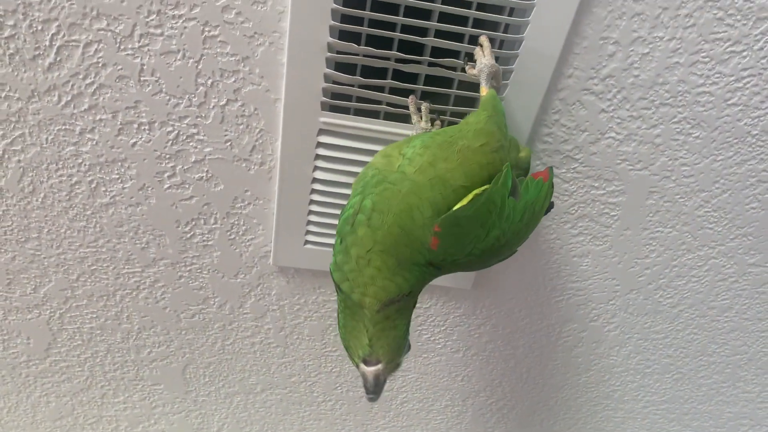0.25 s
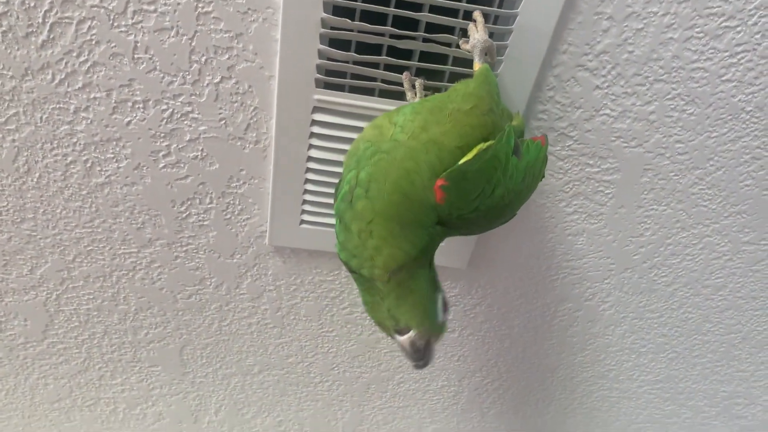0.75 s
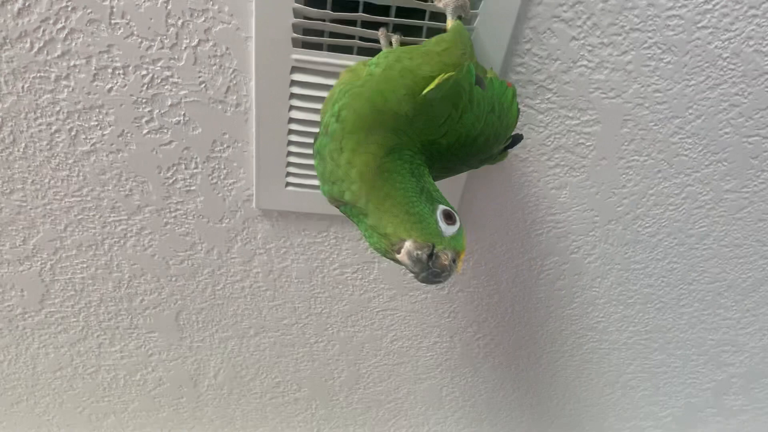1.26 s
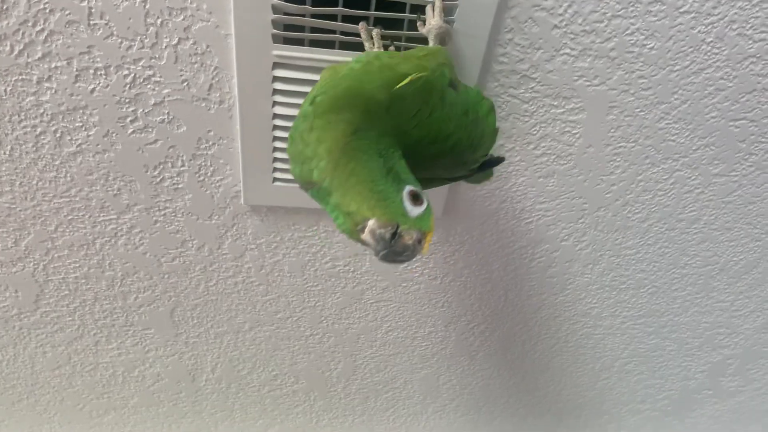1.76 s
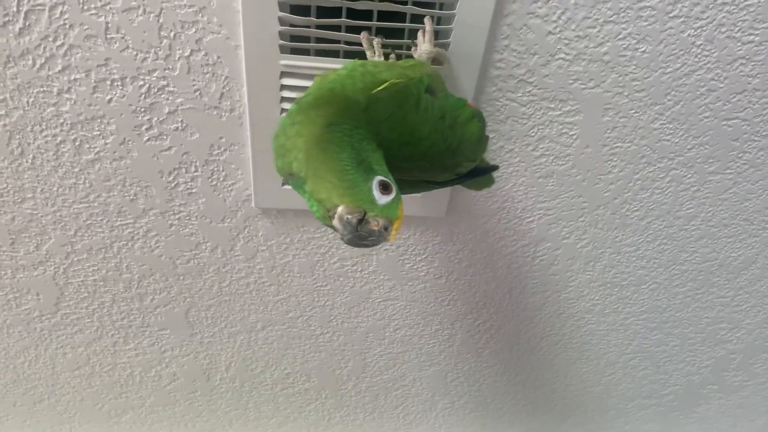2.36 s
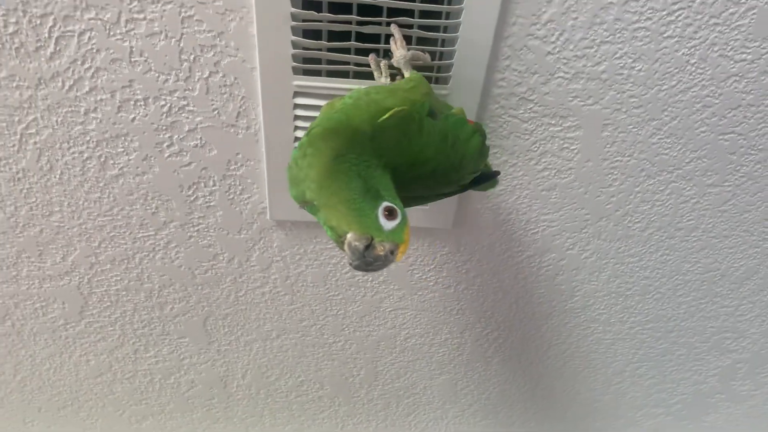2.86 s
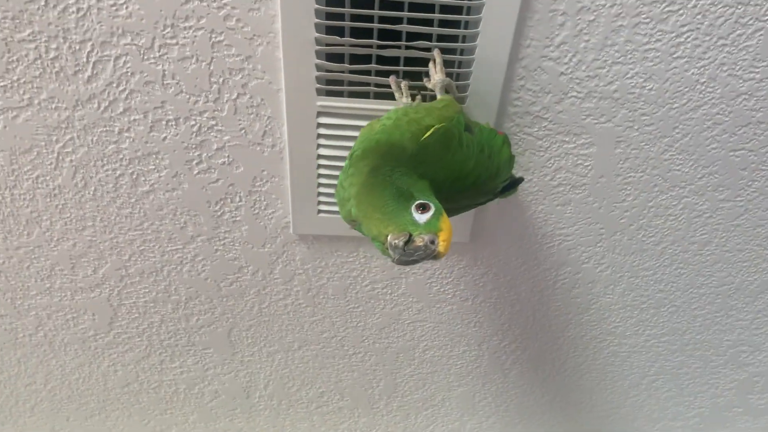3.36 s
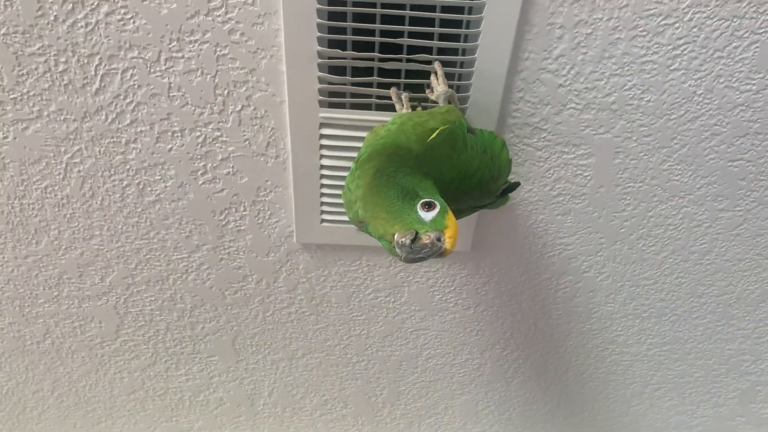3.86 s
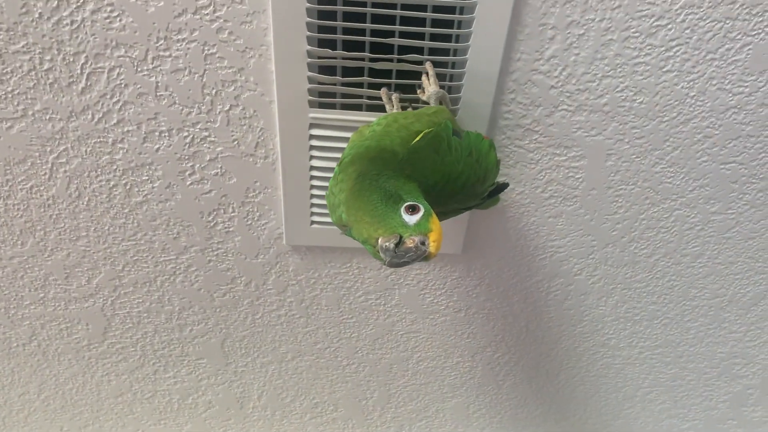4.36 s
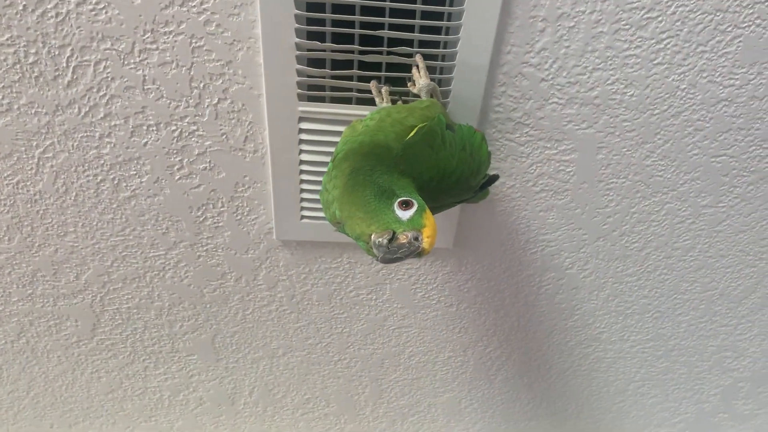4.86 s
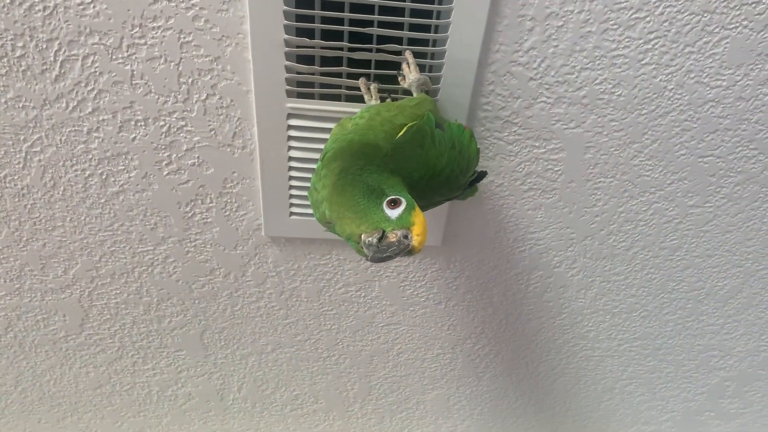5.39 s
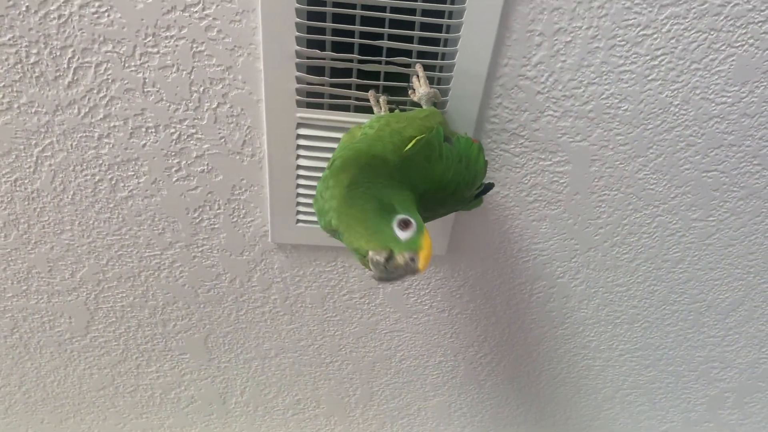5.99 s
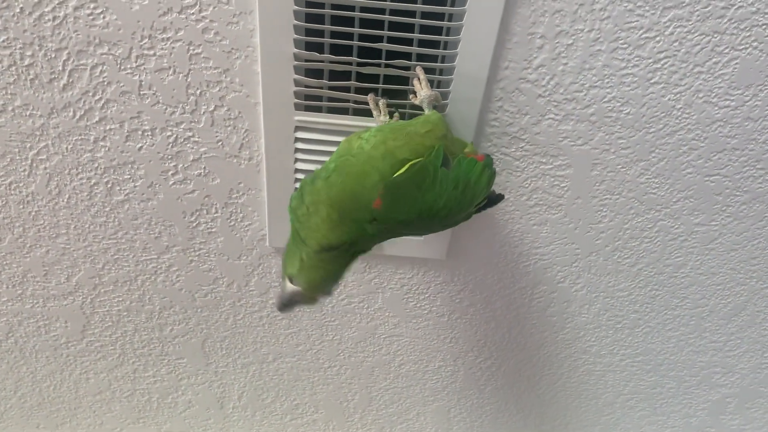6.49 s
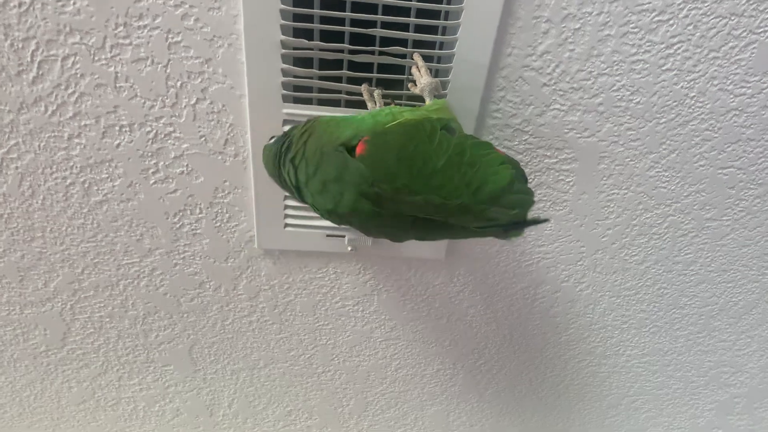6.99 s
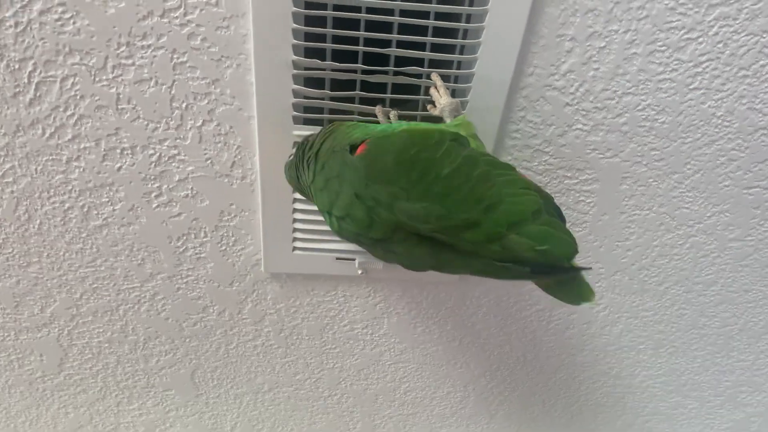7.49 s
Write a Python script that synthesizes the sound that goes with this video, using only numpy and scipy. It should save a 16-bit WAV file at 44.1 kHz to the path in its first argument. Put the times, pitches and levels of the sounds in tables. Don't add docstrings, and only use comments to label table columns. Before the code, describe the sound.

In a quiet room with short, soft echo, faint mains hum and low microphone hiss continue throughout. At 0.1 s a parrot's beak or claw snaps hard on a sheet-metal vent, bright and briefly ringing. Only faint ticks follow until about 1.1 s. From 1.3 to 3.3 s there is an irregular flurry: sharp snaps, ticks and gritty scrapes, strongest near 1.7, 2.25, 2.7 and 3.27 s, with slats singing tinny tones for a fraction of a second. From 3.6 to 4.5 s a hand slides over the phone, a lumpy low rumble with fine rustle, easing into small shifts until 5.2 s; one tick pokes through at 4.15 s. A hard double snap lands at 5.4 s, a weak tap at 5.9 s. Near quiet lasts until 7 s, then lighter taps and scrapes mix with dull phone knocks to the end, around 7.7 s.

```python
import sys
import numpy as np
from scipy import signal
from scipy.fft import rfft, irfft, next_fast_len
from scipy.io import wavfile
from scipy.ndimage import uniform_filter1d

SR = 44100
rng = np.random.default_rng(int(sys.argv[2]) if len(sys.argv) > 2 else 0)


def put_to_file(sound):
    columns = np.atleast_2d(sound).T
    safe = np.clip(columns, -1, 1)
    whole_steps = np.round(safe * 32767)
    wavfile.write(sys.argv[1], SR, whole_steps.astype(np.int16))


def level_to_linear(level):
    exponent = np.asarray(level, float) / 20
    return 10 ** exponent


N = 341334


def rms_one(x):
    return x / np.sqrt(np.mean(x ** 2) + 1e-20)


def at_hz(points, hz):
    table = np.array(points)
    return np.interp(np.log(np.maximum(hz, 1)), np.log(table[:, 0]), table[:, 1])


def colour(x, spectrum):
    log_gain = at_hz(spectrum, np.fft.rfftfreq(8192, 1 / SR)) * np.log(10) / 20
    cepstrum = irfft(log_gain) * np.r_[1, 2 * np.ones(4095), 1, np.zeros(4095)]
    pulse = irfft(np.exp(rfft(cepstrum)))
    return signal.oaconvolve(x, pulse / np.sqrt(np.sum(pulse ** 2)))[:len(x)]


def band_pass(x, low, high):
    return signal.sosfilt(signal.butter(2, [low, high], "band", fs=SR, output="sos"), x)


def ring(push, hz, t60):
    r, w = level_to_linear(-60 / (t60 * SR)), 2 * np.pi * hz / SR
    return signal.lfilter([0, np.sin(w)], [1, -2 * r * np.cos(w), r * r], push + 1e-18)


def grit(spread_db):
    sizes = level_to_linear(spread_db * np.minimum(rng.exponential(1, N), 3))
    return rms_one(rng.standard_normal(N) * sizes)


def waver(spread_db, rate):
    r = np.exp(-80 * np.pi * rate / SR)
    slow = signal.lfilter([1], [1, -2 * r, r * r], rng.standard_normal(N // 40 + 2002))[2000:]
    return np.interp(np.arange(N) / 40, np.arange(len(slow)), level_to_linear(spread_db * rms_one(slow)))


def swell(start, end, db, rise, fall):
    out = np.zeros(N)
    t = np.arange(max(start - 3 * rise, 0) * SR, min((end + 3 * fall) * SR, N)).astype(int)
    outside = np.maximum((start - t / SR) / rise, (t / SR - end) / fall)
    out[t] = level_to_linear(db - 20 * np.maximum(outside, 0))
    return out


# multiple, level/dB rms
HUM = [(1, -55), (2, -65.5), (3, -64), (4, -86), (5, -90), (6, -87.5), (7, -84.5)]


def hum():
    mains_hz = 60.0
    turn = 2 * np.pi * mains_hz * np.arange(N) / SR
    return sum(np.sqrt(2) * level_to_linear(db) * waver(1.9, 1.6) * np.sin(round(k) * turn + 0.6 * k) for k, db in HUM)


# f/Hz, level/dB per Hz
FLOOR = [(22, -31.5), (35, -30.5), (48, -5.5), (90, -8), (150, -12), (250, -18), (350, -24.5), (500, -28),
         (800, -34), (1500, -39.5), (3000, -43), (6000, -43.5), (15600, -45.5), (16100, -87)]


def noise_floor():
    floor_db = -65
    return level_to_linear(floor_db) * colour(rng.standard_normal(N), FLOOR)


# f/Hz, t60/s
ROOM_T60 = [(400, .42), (1300, .34), (3500, .28), (9000, .21), (16000, .15)]


def room(x):
    t, tail = np.arange(SR // 2) / SR, 0
    edges = 250 * 2 ** np.arange(0, 6.3, .5)
    for low, high in zip(edges, edges[1:]):
        band = band_pass(rng.standard_normal(len(t)), low, high)
        tail = tail + band * level_to_linear(-60 * t / at_hz(ROOM_T60, np.sqrt(low * high)))
    tail = tail * (1 - np.exp(-t / 0.016))
    return signal.fftconvolve(x, tail / np.sqrt(np.sum(tail ** 2)))[:N]


# t/s, level/dB
GRIP = [
    (3.56, -89),
    (3.6, -62),
    (3.665, -55),
    (4.14, -52.5),
    (4.33, -51.5),
    (4.46, -56),
    (4.56, -68),
    (5.1, -64.5),
    (5.25, -80),
]
# t/s, level/dB
REGRIPS = [
    (4.345, -66),
    (4.597, -57),
    (4.697, -60.5),
    (4.825, -61),
    (5.0, -109),
    (5.143, -64.5),
    (7.11, -66),
    (7.16, -67),
    (7.45, -58.5),
]


def touch():
    regrip_s, rustle_db, rustle_follows = 0.055, -63.5, 0.77
    s, db = np.transpose(GRIP)
    span = slice(round(s[0] * SR), round(s[-1] * SR))
    pressure = np.zeros(N)
    pressure[span] = level_to_linear(np.interp(np.arange(N)[span] / SR, s, db))
    pressure += sum(swell(s, s, db, regrip_s, regrip_s) for s, db in REGRIPS)
    pressure = pressure * waver(2.5, 16)
    return pressure, level_to_linear(rustle_db) * (pressure / level_to_linear(-52.5)) ** rustle_follows


# f/Hz, level/dB per Hz
RUMBLE = [(22, -25.5), (35, -8), (70, 2.5), (140, -1.5), (250, -7.5), (310, -4), (400, -9.5), (520, -5.5),
          (700, -30.5), (1200, -37), (2200, -35)]
# f/Hz, level/dB per Hz
RUSTLE = [(300, -3), (700, 0), (1500, -4), (3000, -6), (5000, -9), (6300, -13), (7500, -18), (8900, -16),
          (10500, -16.5), (12000, -16), (14000, -14), (15700, -14.5), (16100, -50)]


def hand(rumble, rustle):
    low = colour(rng.standard_normal(N), RUMBLE) * waver(1.77, 11.3)
    skin = colour(grit(1.4), RUSTLE)
    dull = signal.sosfilt(signal.butter(2, 1800, fs=SR, output="sos"), skin)
    high = level_to_linear(1.5) * dull * waver(4.4, 15) + (skin - dull) * waver(1.8, 19.1)
    return level_to_linear(-1.0) * rumble * low + level_to_linear(5.5) * rustle * high


# multiple, level/dB against the rumble
SHUDDER = [(2, 0.5), (3, 3), (4, -20)]


def sway(rumble):
    shudder_hz = 21.5
    turn = 2 * np.pi * shudder_hz * np.cumsum(waver(.2, 1.5)) / SR
    tones = sum(level_to_linear(db) * waver(1.1, 1.7) * np.sin(round(k) * turn) for k, db in SHUDDER)
    return uniform_filter1d(rumble, 9000) * tones


# t/s, level/dB peak, f/Hz
BUMPS = [(0.118, -45, 244), (1.724, -39, 105), (2.721, -56, 260), (3.273, -40.5, 123.6),
         (3.277, -43.5, 286), (5.409, -40, 182), (7.075, -39, 335), (7.085, -36, 247), (7.087, -33, 72.4),
         (7.142, -43, 207), (7.169, -40, 239), (7.184, -42, 68), (7.337, -44, 255), (7.347, -36.5, 81.5),
         (7.451, -59, 247), (7.47, -48, 240)]


def bumps():
    out = np.zeros(N + SR)
    for s, db, hz in BUMPS:
        soft, push = np.hanning(round(SR / hz / 2)), np.zeros(SR // 4)
        push[:len(soft)] = level_to_linear(db - 2.5) * soft / soft.sum()
        out[round(s * SR):][:len(push)] += ring(push, hz, 9.8 / hz)
    return out[:N]


# t/s of the peak, level/dB, swell/s, fade/s (each over 20 dB), extra brightness/dB
SLIPS = [(1.1, -53, 0.016, 0.019, -4), (1.865, -41, 0.014, 0.025, -16), (2.285, -39.5, 0.074, 0.12, -2),
         (2.516, -50, 0.011, 0.038, -7), (2.674, -34, 0.027, 0.023, 10.5), (2.962, -41, 0.018, 0.012, 18.5),
         (3.036, -52, 0.018, 0.049, -7), (3.171, -40.5, 0.041, 0.033, 9), (5.148, -54, 0.037, 0.12, 15),
         (5.271, -63, 0.021, 0.049, 18), (5.388, -37, 0.028, 0.004, -6), (5.958, -58, 0.078, 0.02, -8),
         (6.561, -64.5, 0.077, 0.046, 11), (7.12, -62, 0.11, 0.076, 1), (7.4, -75, 0.081, 0.1, -11),
         (7.45, -65, 0.26, 0.047, 13), (7.635, -40, 0.045, 0.031, 8)]
# start t/s, end t/s, level/dB, extra brightness/dB, extra body/dB
CREEPS = [(1.28, 1.55, -60, -5.5, -1), (1.348, 1.383, -48, 4.5, -9), (1.543, 1.556, -32, -7.5, -4),
          (0.089, 0.107, -50, 7, 0), (2.036, 2.051, -49, 11.5, -10.5), (2.073, 2.092, -47, 0, -2),
          (2.074, 2.226, -57.5, -17.5, -0.5), (2.23, 2.242, -46.5, 22.5, 6.5),
          (2.643, 2.698, -41.5, -6, -1.5), (2.728, 2.755, -47, -3, -0.5), (2.972, 3.255, -55, -11, 0),
          (5.188, 5.38, -66, -9, 9.5), (7.02, 7.22, -77.5, -6.5, 20.5), (7.242, 7.27, -52, 9.5, 1.5),
          (7.327, 7.465, -64.5, -3, 11.5), (7.558, 7.763, -62, -31, 7)]


def drags():
    edge_s = 0.017
    low, middle, top = np.zeros((3, N))
    parts = [(swell(s, s, db, max(rise, .002), max(fall, .002)), 0, bright_db)
             for s, db, rise, fall, bright_db in SLIPS]
    parts += [(swell(start, end, db, edge_s / 4, edge_s), body_db, bright_db)
              for start, end, db, bright_db, body_db in CREEPS]
    for gain, body_db, bright_db in parts:
        low += gain * level_to_linear(body_db)
        middle += gain
        top += gain * level_to_linear(bright_db)
    return [low, middle, top]


# t/s, level/dB peak, low tones/dB, high tones/dB, rattle decay/s
SNAPS = [(0.1105, -14.5, -1, 4, 0.006), (1.3607, -45.5, -4, 20.5, 0.011), (1.4614, -25.5, 1, 5, 0.0059),
         (1.494, -23, -3.5, 8.5, 0.0032), (1.5615, -22, 6, 14.5, 0.0081), (1.694, -17, 5.5, 12.5, 0.0091),
         (1.9543, -33.5, -6.5, 6, 0.012), (2.123, -42.5, 15, 12.5, 0.0072), (2.194, -32.5, -10, 7, 0.0064),
         (2.2576, -27.5, 3, 18, 0.006), (2.2625, -22.5, 0, 6.5, 0.0036), (2.2808, -25, 8, 14, 0.0069),
         (2.6335, -46, 2, 17, .015), (2.7058, -21.5, -2.5, 12, 0.01), (2.7646, -20.5, -2, 7.5, 0.0053),
         (2.9555, -35, -13.5, 1.5, 0.02), (3.1, -32.5, 0, 14.5, 0.014), (3.2655, -14, -2, 7.5, 0.0086),
         (5.3915, -19.5, 0, 10, 0.0056), (5.3985, -14.5, 0, -7, 0.004), (5.417, -28, 2, -3, 0.0029),
         (5.9154, -39, 1.5, -2, 0.0071), (7.0718, -32, 3.5, 7, 0.0059), (7.329, -36, 0, 9, 0.0035),
         (7.3806, -29, 4.5, -16, 0.0037), (7.6297, -36, -6, 13.5, 0.0049), (7.641, -32.5, -20, 4, 0.0092),
         (.1225, -31, 8.5, -3, 0.0064)]
# t/s, level/dB peak, high tones/dB
TICKS = [(0.3249, -49, 0), (0.4453, -75, -2), (0.525, -64, -1), (0.79, -67, 6), (1.0892, -56.5, 8),
         (1.1902, -59.5, 4), (1.2721, -47, 2.5), (1.315, -51, -6), (1.4358, -40, 5.5), (1.5455, -45, -19),
         (2.2326, -47.5, 3), (2.2472, -26.5, -3.5), (2.949, -49, 5), (7.2335, -63, -5), (7.6129, -51, 12),
         (1.859, -38.5, 0.5), (2.0412, -49, 15.5), (2.0775, -41.5, 0), (2.513, -75, 16), (3.032, -37, 3.5),
         (4.1545, -41.5, 2), (5.1405, -56, 7), (6.552, -71, 4), (7.013, -56, 1.5), (7.1458, -45.5, 7),
         (7.5702, -65, 18), (7.7207, -48.5, 4.5)]


def contacts():
    tick_low_db, tick_rattle_s = 3, 0.0087
    ticks = [(s, db, tick_low_db, high_db, tick_rattle_s) for s, db, high_db in TICKS]
    rows = np.array(sorted(list(SNAPS) + ticks))
    lead_s = 0.0061 * level_to_linear(0.16 * (rows[:, 1] + 20))
    return np.c_[rows, lead_s]


def contact_shapes():
    lead_db, snap_db, snap_s = -15.5, 0.42, 0.00049
    t, taps = np.arange(-2000, 3000) / SR, contacts()
    decay, lead = np.maximum(taps[:, 4:5], 3e-4), np.maximum(taps[:, 5:6], 1e-4)
    after = np.maximum(t, 0)
    fall = 1.348 * np.exp(-after / decay) + level_to_linear(snap_db) * np.exp(-after / snap_s)
    return np.where(t < 0, level_to_linear(lead_db) * np.exp(np.minimum(t, 0) / lead), fall)


def contact_force(shapes, hz, chance_db):
    out = np.zeros(N + SR)
    for (s, db, low_db, high_db, _, _), shape, luck_db in zip(contacts(), shapes, chance_db):
        at = round(s * SR) - 2000
        level_db = db + luck_db + low_db * (850 < hz < 3900) + high_db * (hz > 8000)
        out[at:at + len(shape)] += level_to_linear(level_db) * shape
    return out[:N]


# t/s, level/dB
# peak, f/Hz, t60/s
RINGS = [(0.111, -27, 2900, 0.035), (0.14, -42.5, 1900, 0.1), (0.51, -49.5, 2830, 0.021),
         (1.271, -46, 4200, 0.094), (1.28, -56, 1080, 0.21), (1.312, -47, 2830, 0.12),
         (1.46, -42, 2600, 0.08), (1.463, -46, 1900, 0.08), (1.545, -42, 1750, 0.06),
         (1.696, -19, 2360, 0.075), (1.873, -56, 1030, 0.42), (2.078, -48, 6200, 0.04),
         (2.079, -44, 3000, 0.06), (2.082, -54, 1030, 0.3), (2.66, -44, 1653, 0.12),
         (3.269, -43, 1818, 0.19), (2.665, -44, 2980, .12), (1.3, -58, 1250, .15), (1.3, -59, 900, .15),
         (5.4, -57.5, 2215, .2), (5.773, -58.5, 1365, 0.049), (5.268, -64, 1080, .5),
         (5.398, -38.5, 2570, 0.15), (5.42, -64, 1095, 1.2), (5.40, -46, 520, 0.15),
         (7.0725, -39, 2780, 0.03), (7.08, -39.5, 893, 0.056), (7.234, -44, 2750, 0.13),
         (7.255, -54, 3100, 0.16), (7.076, -38, 250, 0.12), (7.44, -47.5, 244, 0.2),
         (7.15, -50, 180, 0.075), (7.28, -55, 3000, 0.089), (3.266, -28, 1900, .04),
         (3.266, -34, 1250, 0.021), (3.266, -30.5, 12000, .03), (1.696, -37, 1250, 0.0396),
         (.111, -21, 11300, 0.024), (.111, -42.5, 1700, .04), (5.393, -29.5, 1800, 0.0403),
         (5.393, -26.5, 11000, 0.042), (2.707, -29.5, 11600, .03), (2.707, -42, 2200, .03),
         (1.563, -35, 1500, .04), (2.766, -42, 1640, .15), (.111, -36, 14400, .12), (1.86, -56, 800, .1),
         (7.381, -41, 3250, 0.063), (5.393, -30, 15200, 0.05)]
# t/s, level/dB peak, f/Hz, t60/s
PANEL_RINGS = [(.113, -52, 596, 0.36), (.113, -57.5, 900, 0.22), (.113, -46, 2540, 0.22),
               (.113, -56.5, 2934, .2), (.113, -50.5, 3350, 0.17), (.113, -39.5, 6800, 0.19),
               (.113, -39, 10950, 0.068), (1.564, -40, 2950, 0.14), (1.564, -47.5, 6557, .1),
               (1.697, -45, 2000, 0.18), (1.697, -46, 2560, 0.22), (1.697, -44, 3060, 0.22),
               (1.697, -41.5, 3510, 0.36), (1.697, -42, 4000, 0.22), (1.697, -36.5, 6760, 0.16),
               (1.697, -43, 11603, .08), (2.245, -51.5, 2560, 0.13), (2.245, -49, 1620, .1),
               (2.26, -36.5, 7000, .06), (2.283, -49.5, 3060, .12), (2.283, -24.5, 2367, 0.081),
               (2.708, -23, 5750, 0.027), (2.708, -40, 2590, 0.17), (3.102, -47, 1678, 0.3),
               (3.102, -54.5, 1840, 0.24), (3.268, -52, 2640, .15), (3.268, -44.5, 2830, 0.43),
               (3.268, -44, 2056, 0.35), (3.268, -43, 1467, 0.31), (3.268, -56, 1100, 0.64),
               (3.268, -52.5, 3760, .12), (3.268, -33, 5520, 0.066), (5.394, -48.5, 900, 0.17),
               (5.394, -45.5, 2050, .2), (5.394, -55, 1670, 0.27), (5.394, -63, 3430, 0.24),
               (5.394, -57, 3951, 0.22), (5.394, -26, 6890, 0.096), (5.394, -37.5, 6550, 0.21),
               (5.394, -46.5, 11440, .08), (5.918, -58, 748, 0.13), (7.074, -51.5, 1560, 0.09),
               (7.382, -48, 2760, .1), (7.43, -54.5, 1550, 0.11), (7.46, -50, 2280, .1),
               (7.632, -55, 1896, 0.14), (7.632, -55, 3290, 0.092), (7.722, -48, 3530, .05),
               (7.15, -60, 1570, 0.071), (7.15, -41, 2585, .05)]
# t/s, level/dB peak, f/Hz, t60/s
SCRAPE_RINGS = [(1.437, -40, 3000, 0.08), (1.495, -43, 2300, .08), (1.563, -38, 2100, .1),
                (1.563, -38, 2400, .08), (1.463, -44, 1600, .08), (7.632, -46, 1800, .1),
                (7.655, -48, 2300, .08), (7.435, -52, 1000, .1), (1.861, -42, 3000, .06),
                (1.8, -48, 1650, .1), (1.8, -47, 2600, .1), (1.88, -60, 1900, .3), (2.124, -46, 2050, .06),
                (2.124, -46, 3000, .06), (2.079, -50, 2450, .1), (2.079, -50, 5200, .05),
                (5.15, -54, 5900, .25), (5.26, -54, 6200, .2), (5.15, -58, 2050, .3), (5.27, -56, 2080, .3),
                (5.16, -65, 1090, .4), (2.958, -42, 3100, .08), (2.958, -46, 2600, .1),
                (2.26, -34, 11200, .04), (2.283, -34, 11600, .04)]


def singing_slats():
    reach_s = .025
    out, t = np.zeros(N + SR), np.arange(SR * 7 // 10) / SR
    loose, touches = waver(4.5, 35), contacts()[:, 0]
    rings = list(RINGS) + list(PANEL_RINGS) + list(SCRAPE_RINGS)
    for (s, db, hz, t60), (p, q) in zip(rings, rng.uniform(0, 2 * np.pi, (len(rings), 2))):
        nearest = touches[np.argmin(abs(touches - s))]
        if abs(nearest - s) < reach_s:
            s = nearest + .001
        turn = 2 * np.pi * t
        tones = np.sin(hz * turn + p) + 0.22 * np.sin((hz + 23) * turn + q)
        tones += 0.5 * np.sin(.972 * hz * turn - q) + .4 * np.sin(1.035 * hz * turn - p)
        fade = level_to_linear(db - 4 - 60 * t / t60) * np.cos(np.pi * t / 1.4)
        onset = 1 - np.exp(-t / (.03 * t60))
        wobble = loose[int(q * SR):][:len(t)]
        out[round(s * SR):][:len(t)] += fade * onset * tones * wobble
    return out[:N]


# f/Hz, level/dB
SLAT_MODES = [(635, -20.5), (1152, -26), (1388, -9), (1641, -3.5), (1819, -7.5), (2368, 0), (2850, 2.5),
              (3644, -18.5), (3999, -1), (4430, -1), (4828, -4), (5087, 4), (5706, 4.5), (6099, -1.5),
              (6556, 2.5), (6896, -1.5), (7057, -3.5), (7364, -4.5), (8295, -8.5), (8667, -24.5),
              (9043, -17), (9953, -4), (10125, -18), (10718, -4.5), (11617, -3.5), (11870, -12.5),
              (13172, -8.5), (13495, -10.5), (13673, -1), (15200, -4.5)]


def slat_tones(shapes, drag):
    rough, out = grit(0.66), np.zeros(N)
    chance = rng.normal(0, 1, (len(shapes), len(SLAT_MODES)))
    for k, (hz, level_db) in enumerate(SLAT_MODES):
        force = contact_force(shapes, hz, 2.5 * chance[:, k])
        force += level_to_linear(-6.0) * drag[int(hz > 2600) + int(hz > 7000)] * waver(6, 16)
        force *= rough
        t60 = 0.018 * (hz / 3000) ** -.3
        pair = ring(force, hz, t60) - .4 * ring(force, 1.013 * hz, t60)
        out += level_to_linear(level_db - 37) * (-1) ** k * pair
    return out


# f/Hz, level/dB per Hz
CRACK = [(300, -21), (600, -15.5), (1000, -11.5), (1600, -9), (2500, 3.5), (3500, 3.5), (5000, 6.5),
         (7000, -10), (9000, -13), (11500, -17.5), (13500, -10.5), (15500, -22.5)]


def bare_crack(shapes, drag):
    air_db, air_hz, body_db, body_hz = 4.5, 9500, 4, 2100
    edges = 170 * 2 ** np.arange(0, 6.9, .4)
    chance = rng.normal(0, 1, (len(shapes), len(edges)))
    bare, out = colour(grit(1.1), CRACK), np.zeros(N)
    for k, (low, high) in enumerate(zip(edges, edges[1:])):
        luck_db = (2 if high > 950 else .5) * chance[:, k]
        force = contact_force(shapes, np.sqrt(low * high), luck_db + air_db * (high > air_hz))
        if high < 950:
            force = level_to_linear(11) * signal.lfilter([.002], [1, -.998], force)
        scrape = drag[int(low > 2400) + int(low > 6500)] * waver(3.75, 28.0)
        scrape *= level_to_linear(7.5 + body_db * (high < body_hz))
        out += level_to_linear(-9.5) * band_pass(bare, low, high) * (force + scrape)
    return out


def grille():
    drag = waver(3, 60) * np.array(drags())
    shapes = contact_shapes()
    return singing_slats() + slat_tones(shapes, drag) + bare_crack(shapes, drag)


# f/Hz, phase of right against left/rad, likeness 0-1
PAIR = [(20, 0, .99), (130, .3, .9), (260, .2, .9), (600, 1.5, .45), (1200, 2.1, .3), (1750, 4.6, .6),
        (2200, 4, .6), (2400, 3.15, .94), (2600, 3.7, .7), (3650, 4.9, .7), (4400, 3.3, .94),
        (4800, 3.1, .95), (6900, 0, .95), (15300, -12.6, .95), (17000, -15, .9)]
# f/Hz, loss/dB
LEFT_LOSS = [(20, 0), (90, 2.2), (1300, 2.2), (2600, .3), (16000, 0)]


def microphones(shared, left_own, right_own):
    size = next_fast_len(N + 4096)
    hz = np.fft.rfftfreq(size, 1 / SR)
    table_hz, table_phase, table_alike = np.transpose(PAIR)
    phase = np.interp(hz, table_hz, table_phase)
    alike = np.clip(np.interp(hz, table_hz, table_alike), 0, 1)
    common, own = rfft(shared, size) * np.sqrt(alike), np.sqrt(1 - alike)
    left = common * np.exp(-.5j * phase) + own * rfft(left_own, size)
    right = common * np.exp(.5j * phase) + own * rfft(right_own, size)
    shade = level_to_linear(at_hz(LEFT_LOSS, hz) / 2)
    return irfft(np.array([left / shade, right * shade]), size)[:, :N]


def scene():
    metal, (rumble, rustle) = grille(), touch()
    paths = [level_to_linear(-9.5) * room(metal) + hand(rumble, rustle) + noise_floor() for _ in range(3)]
    shared = paths[0] + metal
    left_own = paths[1] + np.pad(metal, (131, 0))[:N]
    right_own = paths[2] - np.pad(metal, (257, 0))[:N]
    body = hum() + bumps() + sway(rumble)
    return microphones(shared, left_own, right_own) + body * level_to_linear([[-.7], [.7]])


# down/Hz, up/Hz
GAP_SHIFTS_HZ = [(-150, -100), (0, 0), (150, 250), (-350, 100)]


def empty_bands(x, gaps, spared):
    hold_s, size = .046, next_fast_len(N)
    hz, spectrum = np.fft.rfftfreq(size, 1 / SR), rfft(x, size)
    choice = rng.integers(0, len(GAP_SHIFTS_HZ), N)[(np.arange(N) / SR / hold_s).astype(int)]
    out = x.copy()
    for k, (down, up) in enumerate(GAP_SHIFTS_HZ):
        inside = sum(np.clip(np.minimum(hz - low - down, high + up - hz) / 70 + .5, 0, 1) for low, high in gaps)
        band = irfft(spectrum * np.minimum(inside, 1), size)[:N]
        out -= uniform_filter1d((choice == k) * 1., 400) * (1 - spared) * band
    return out


# low f/Hz, high f/Hz
SUM_GAPS = [(4350, 5100), (8320, 9450), (12450, 13750), (15900, 18000)]
# low f/Hz, high f/Hz
DIFFERENCE_GAPS = [(6350, 7550), (10400, 11700), (14500, 15850), (15950, 18000)]


def thin_stereo(left, right):
    level = uniform_filter1d(np.diff(left, prepend=0) ** 2, 200)
    attack = level > 30 * np.roll(level, 400)
    spared = np.clip(uniform_filter1d(attack * 1., 450) * 2, 2e-4, 1)
    mid = empty_bands((left + right) / 2, SUM_GAPS, spared)
    side = empty_bands((left - right) / 2, DIFFERENCE_GAPS, spared)
    return np.array([mid + side, mid - side])


def roll_off(x):
    return signal.sosfilt(signal.butter(12, 16980, fs=SR, output="sos"), x)


def record(dry):
    left, right = signal.sosfilt(signal.cheby2(12, 60, 17000, fs=SR, output="sos"), dry)
    mix = thin_stereo(left, right)
    return roll_off(mix)


dry = scene()
out = record(dry)
put_to_file(out)
```